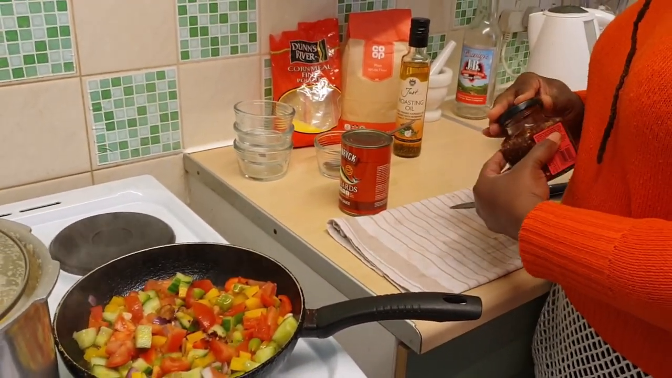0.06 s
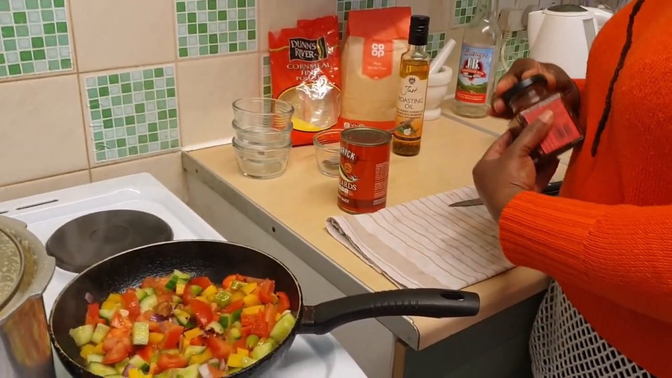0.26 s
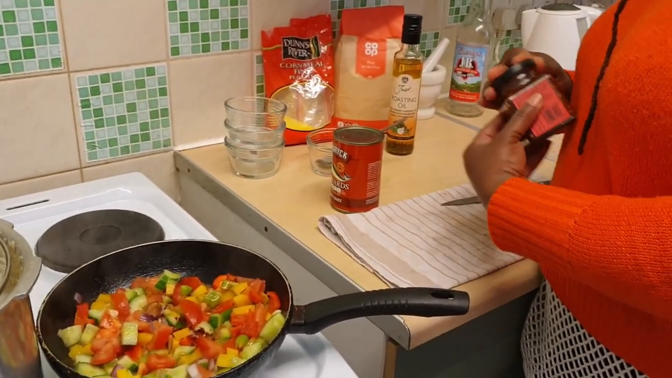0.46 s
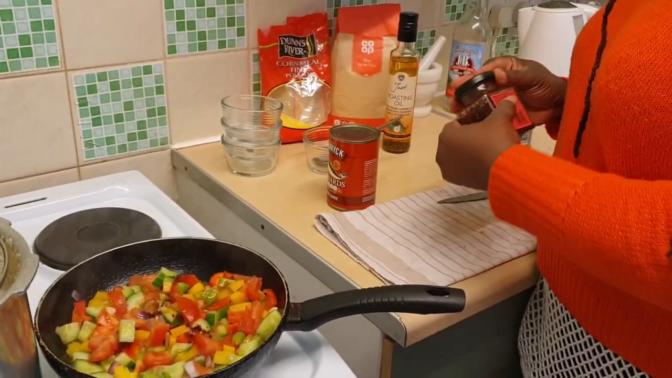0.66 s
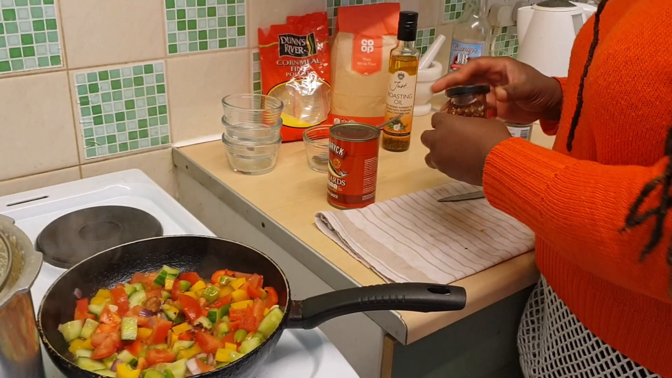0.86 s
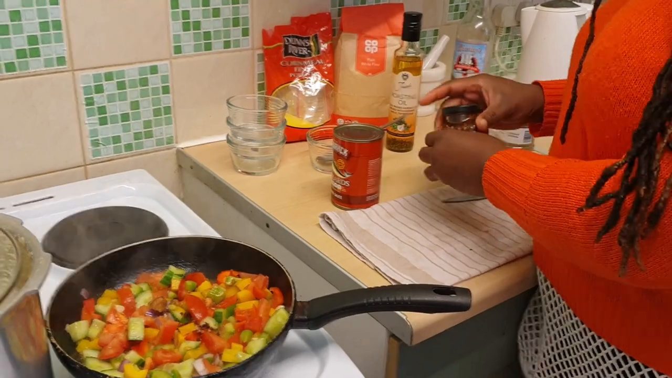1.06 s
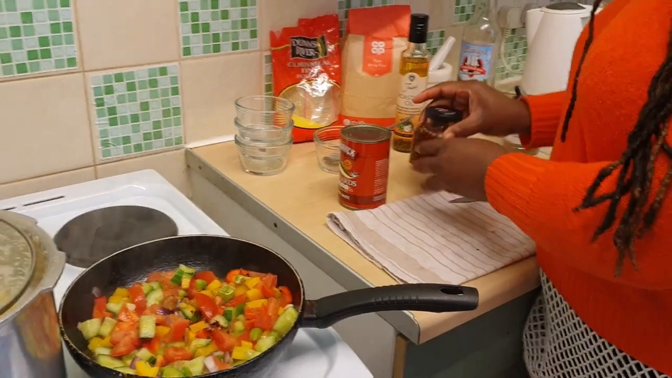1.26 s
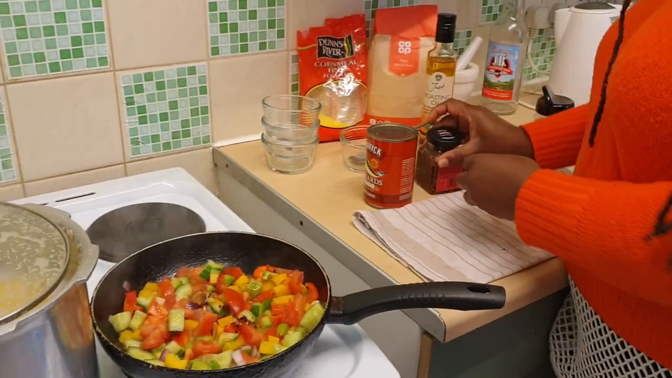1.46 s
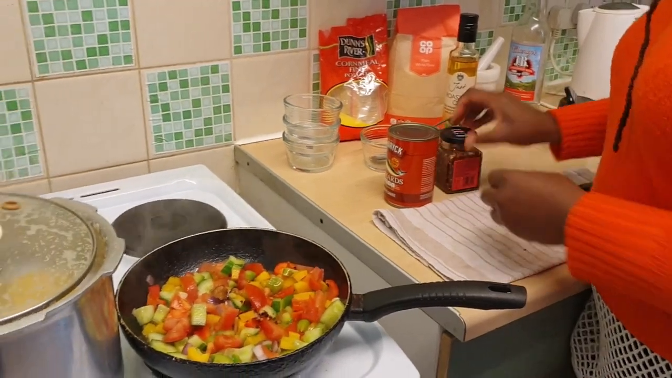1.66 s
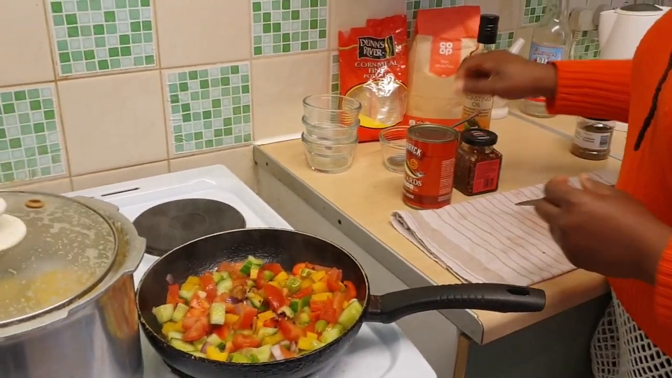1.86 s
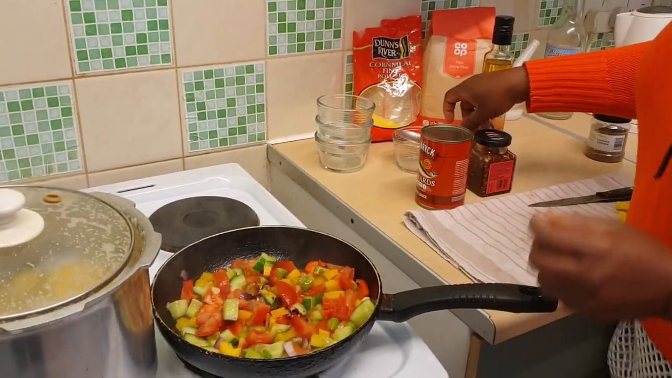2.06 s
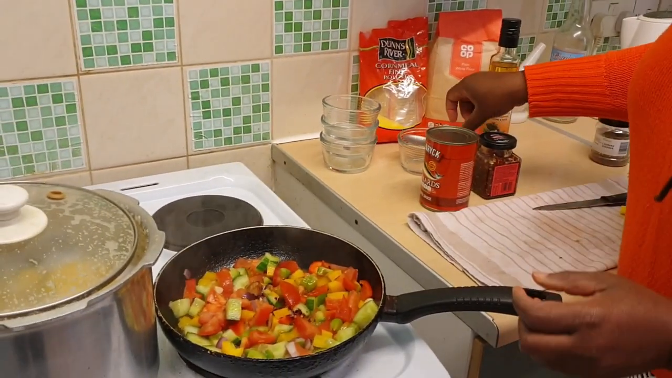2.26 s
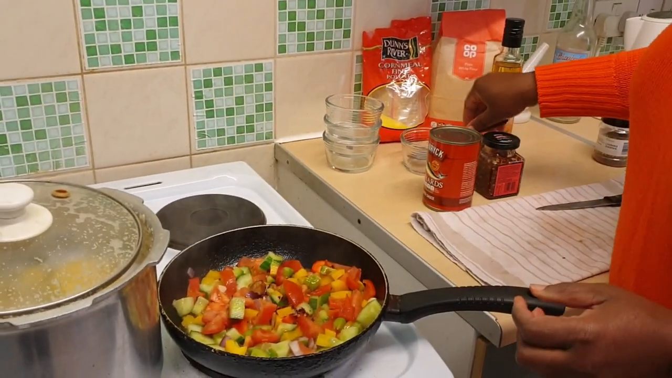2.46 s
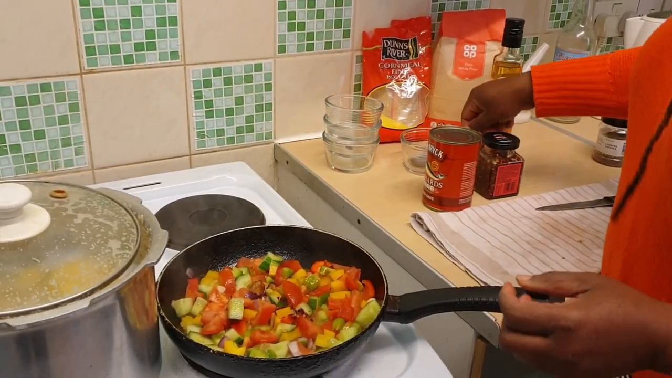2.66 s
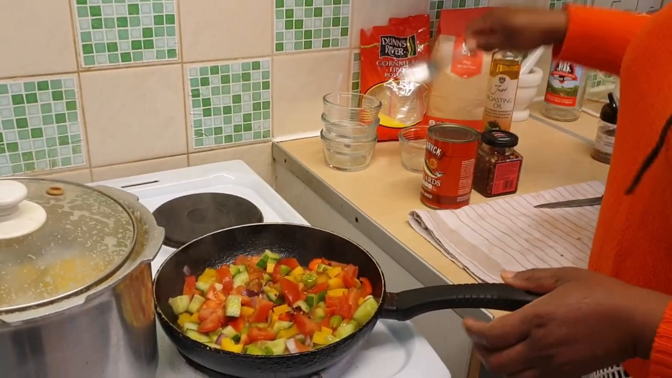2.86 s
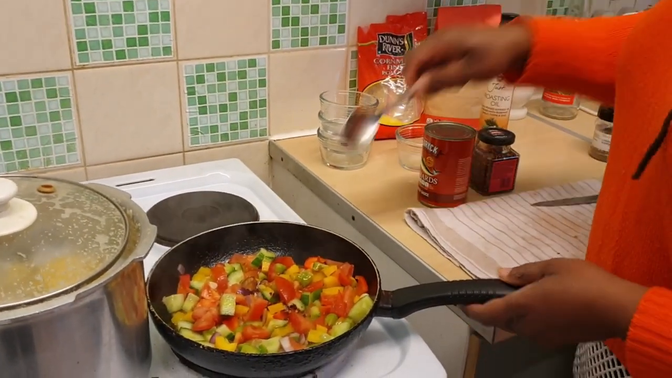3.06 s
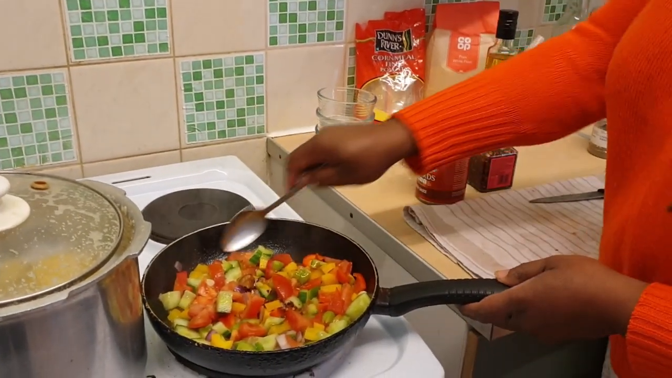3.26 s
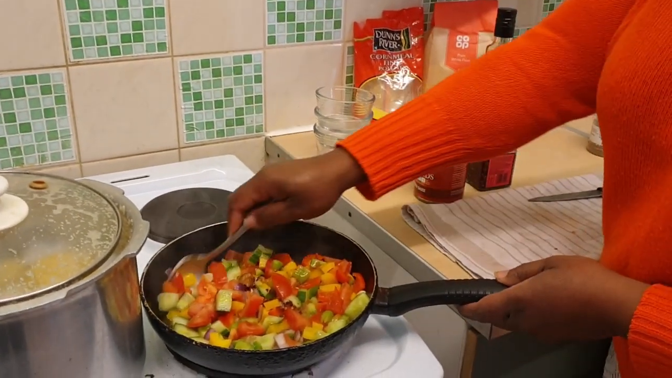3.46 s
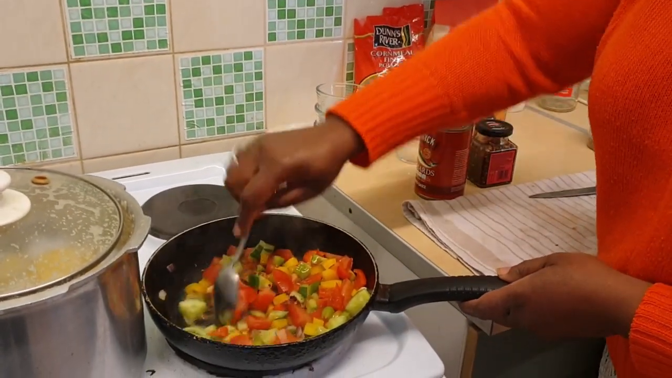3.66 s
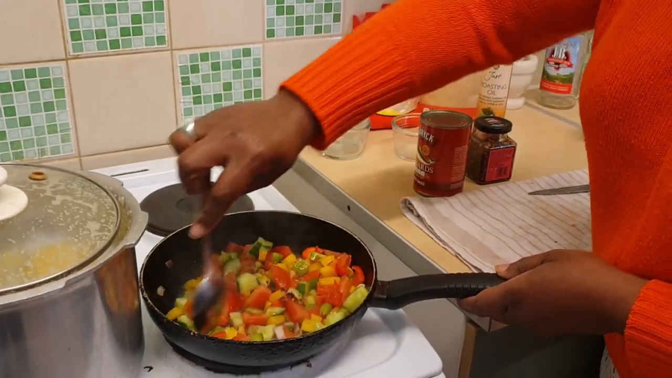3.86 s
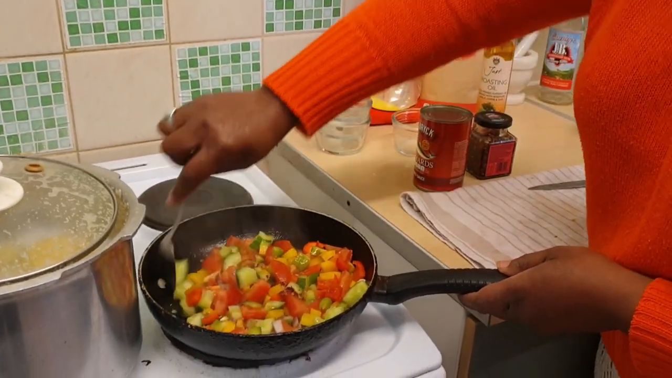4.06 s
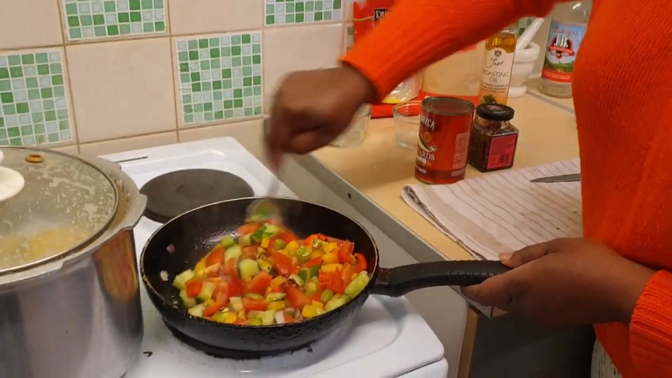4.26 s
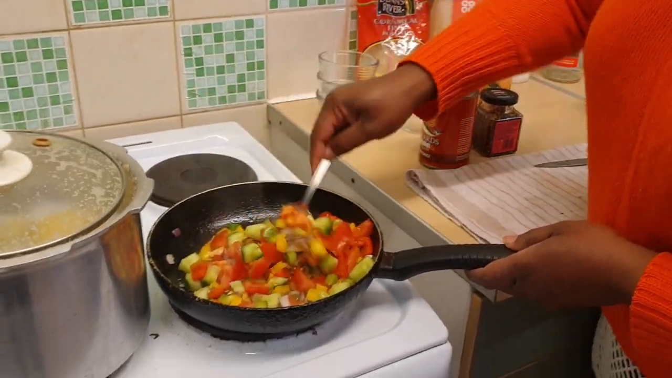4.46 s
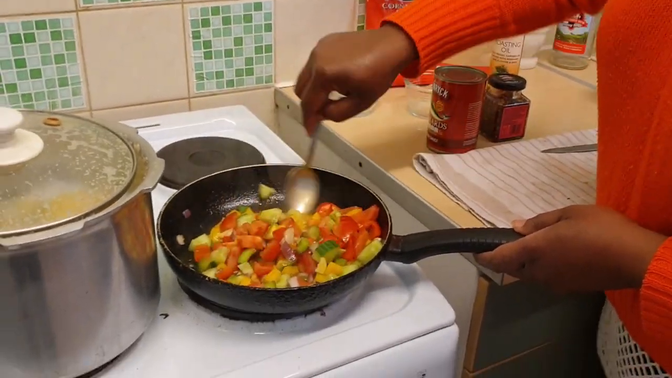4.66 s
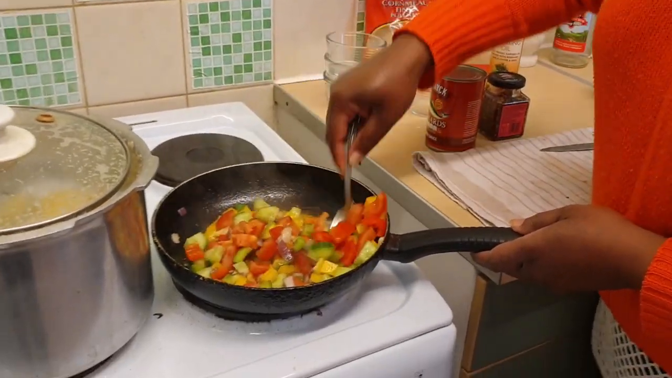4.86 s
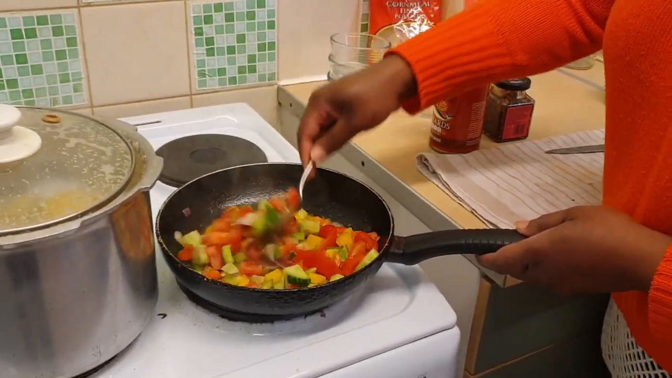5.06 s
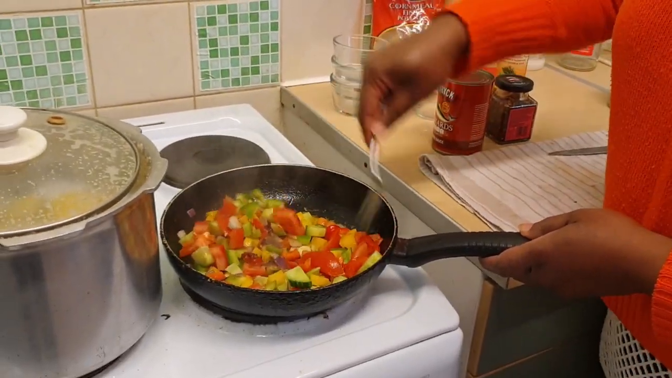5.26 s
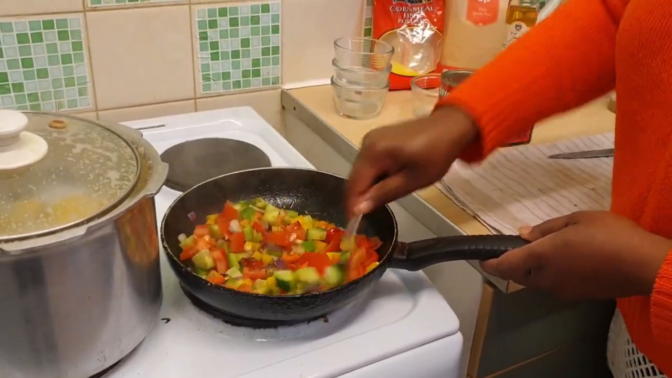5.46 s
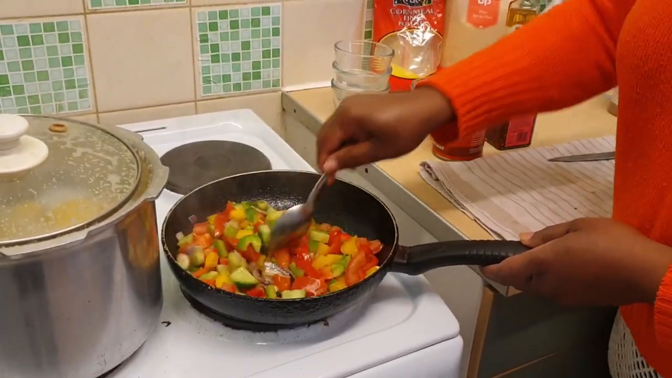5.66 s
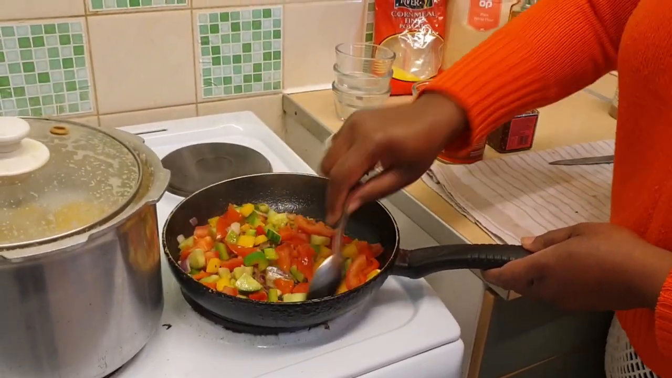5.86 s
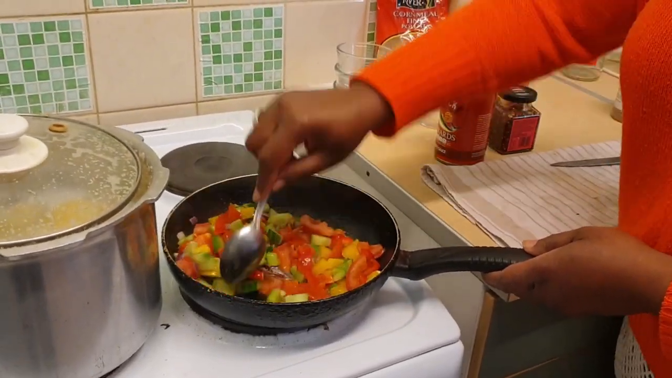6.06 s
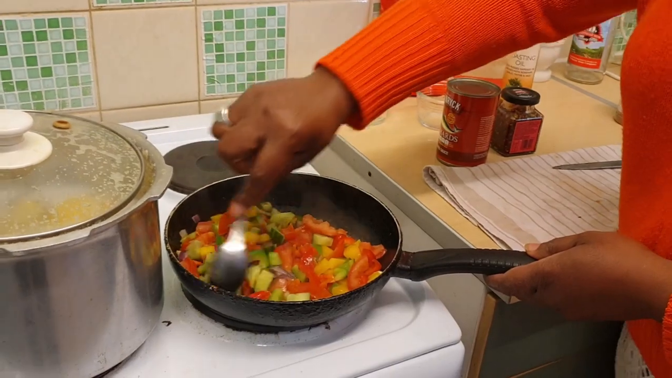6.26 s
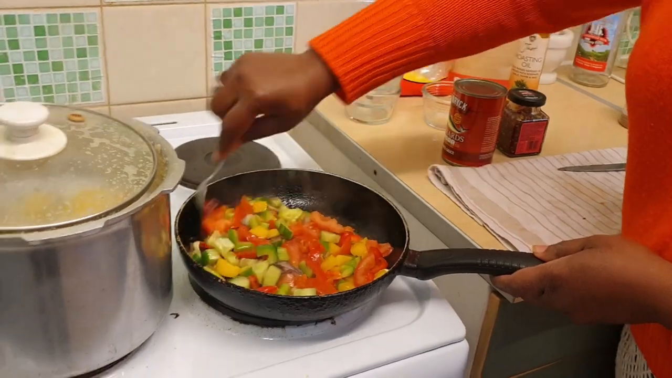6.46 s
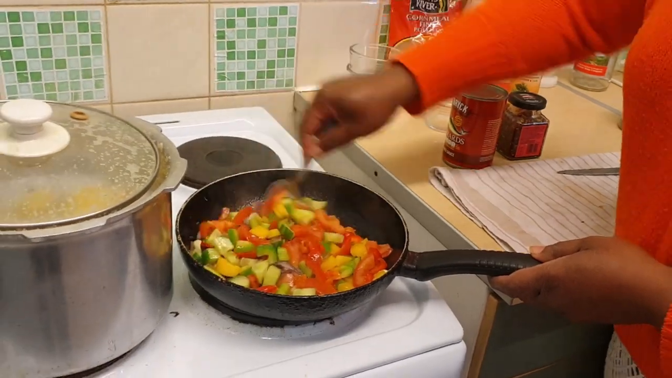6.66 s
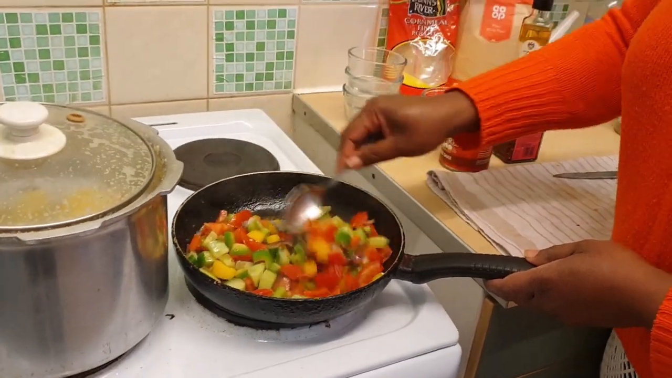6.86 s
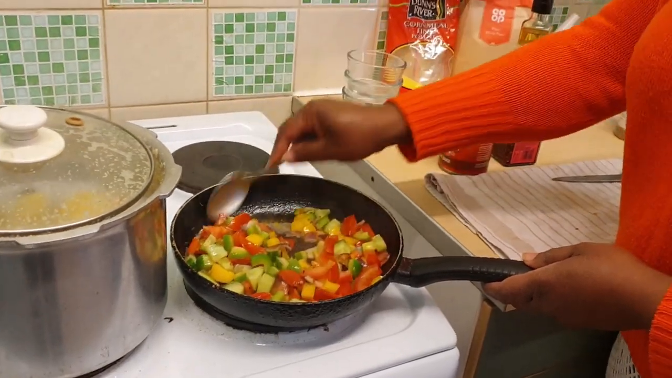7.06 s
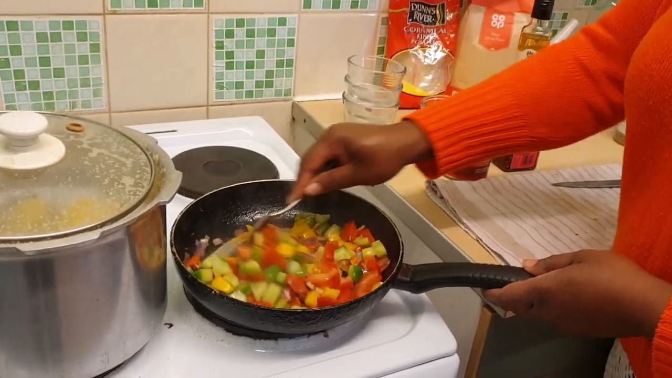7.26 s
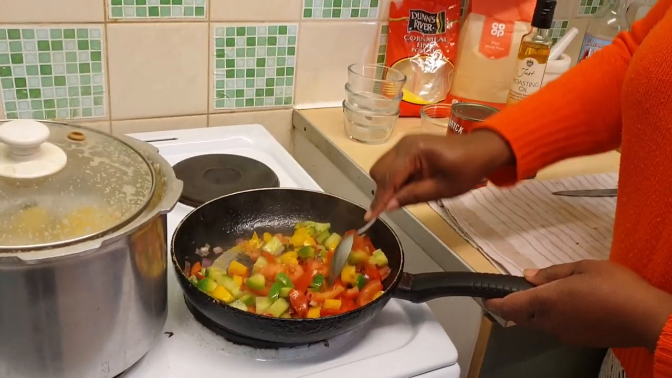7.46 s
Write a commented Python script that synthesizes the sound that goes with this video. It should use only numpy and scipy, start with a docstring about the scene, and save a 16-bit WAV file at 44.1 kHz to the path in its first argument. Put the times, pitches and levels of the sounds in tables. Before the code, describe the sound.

Vegetables fry with a continuous fine, crisp sizzle over a softer simmer and faint low cooker rumble. A small lid pops, a jar lands and rocks on a hollow worktop, and a spoon jingles brightly in a glass. The spoon then taps the pan rim, pushes food with dull rubs, scrapes and knocks, and the wet pieces spit harder. Close stereo microphones in a small tiled kitchen.

```python
"""A small tiled kitchen, where a spaced pair of microphones hears chopped vegetables sizzle in a frying pan.
Dense random crackle makes the fizz and simmer, with flares of spitting; the electric cooker rumbles as low noise.
A spice jar's lid pops shut and the jar lands on the worktop, shaking a spoon that stands in a glass.
The spoon jingles out, taps the pan, scrapes and knocks: blows are noise cracks with ringing modes,
and pushes and scrapes are crackle shaped by each stroke."""
import sys
import numpy as np
from scipy import signal
from scipy.fft import rfft, irfft, next_fast_len
from scipy.io import wavfile

SR = 44100
rng = np.random.default_rng(int(sys.argv[2]) if len(sys.argv) > 2 else 0)


def transcribe(signal):
    """Save signal, clipped to [-1, 1], as a 16-bit WAV file at the path in sys.argv[1]."""
    frames = np.atleast_2d(signal).T
    limited = np.clip(frames, -1, 1)
    pcm = np.round(limited * 32767).astype(np.int16)
    wavfile.write(sys.argv[1], SR, pcm)


N = 331191
TIME = np.arange(N) / SR

# likeness of the room's sound at the two microphones: f/Hz, correlation (-1 to 1)
LIKENESS = [(60, .88), (300, .9), (650, .7), (1000, .42), (1500, .05), (2300, -.12), (4000, 0), (16000, 0)]
# spectrum shared by the spitting pieces and the scraping spoon: f/Hz, level/dB
SPIT_AND_SCRAPE = [(200, -17), (700, -24.5), (1050, 1.5), (1400, -4.5), (1900, 3), (2600, -3), (3600, 2),
                   (4500, 0), (7000, -2.5), (16000, -39)]


def amp(db):
    """Decibels to gain."""
    return 10 ** (np.asarray(db) / 20)


def evened(x):
    """Scales to unit rms."""
    return x / np.sqrt(np.mean(x ** 2) + 1e-20)


def read(points, hz):
    """Reads a spectrum on a log-frequency axis."""
    f, value = np.transpose(points)
    return np.interp(np.log(hz + 1), np.log(f + 1), value)


def level(rows):
    """Gain curve through (t/s, level/dB) points."""
    return amp(np.interp(TIME, *np.transpose(rows)))


def add(mix, s, sound):
    """Mixes a sound in at time s."""
    part = mix[:, round(s * SR):][:, :sound.shape[1]]
    part += sound[:, :part.shape[1]]


def lean(db):
    """Left and right gains for a level difference; positive leans left."""
    return amp([[db / 2], [-db / 2]])


def colour(x, points, size=4096):
    """Causal (minimum-phase) filter with the given spectrum."""
    hz = abs(np.fft.fftfreq(size, 1 / SR))
    log_gain = np.log(amp(read(points, hz)))
    response = np.exp(signal.hilbert(log_gain).conj())  # the log gain's Hilbert transform gives the phase
    taps = np.fft.ifft(response).real[:size // 2]
    return signal.oaconvolve(x, taps[None], axes=1)[:, :x.shape[1]]


def cut(x, hz, kind):
    """Second-order low or high cut-off ("low" keeps what lies below hz)."""
    return signal.sosfilt(signal.butter(2, hz, kind, fs=SR, output="sos"), x)


def resonate(x, hz, width_hz):
    """A single resonance at hz, its width set by the damping."""
    pole = np.exp((2j * np.pi * hz - np.pi * width_hz) / SR)
    return signal.lfilter([1 - abs(pole)], [1, -pole], x).real


def pair(x):
    """Two spaced microphones hear much the same bass but nearly unrelated treble."""
    size = next_fast_len(x.shape[1])
    left, right = rfft(x, size)
    same = read(LIKENESS, np.fft.rfftfreq(size, 1 / SR))
    mid = (left + right) * np.sqrt(1 + same)
    side = (left - right) * np.sqrt(1 - same)
    return evened(irfft(np.array([mid + side, mid - side]), size)[:, :x.shape[1]])


def crackle(per_s, spread_db, direct_db, tail_s, count=6):
    """Tiny bursts of uneven size at several spots in the pan, each with its own reflections."""
    sizes = amp(spread_db * np.minimum(rng.exponential(1, N), 4)) * rng.choice([-1, 1], N)
    sizes *= rng.random(N) < per_s / SR
    spot = rng.integers(0, count, N)
    t = np.arange(SR // 8) / SR
    lag = round(.00014 * SR)
    out = np.zeros((2, N))
    for k in range(count):
        paths = rng.standard_normal((2, len(t))) * amp(-60 * t / tail_s)
        paths /= np.linalg.norm(paths[0])
        paths[[0, 1], [0, lag]] += amp(direct_db)  # direct sound, earlier in the left path
        bursts = (sizes * (spot == k))[None]
        out += signal.oaconvolve(bursts, paths, axes=1)[:, :N]
    return pair(out)


def blow(modes, clack, ring_db, crack_db, crack_s, room_s, swell_cycles, vary_db, blur, blur_hz=120):
    """A short crack, its wash off the tiles and the ringing modes; as much energy as 30 ms at unit rms."""
    t = np.arange(SR // 3) / SR
    fade = amp(crack_db) * np.exp(-t / crack_s) + amp(-60 * t / room_s)
    wash = colour(pair(rng.standard_normal((2, len(t)))) * fade, clack)
    ring = np.zeros_like(wash)
    for hz, db, t60 in modes:
        # phase between the microphones, from their likeness at this pitch
        apart = np.arccos(read(LIKENESS, hz)) * rng.choice([-1, 1])
        phase = rng.uniform(0, 2 * np.pi) + np.array([[0], [apart]])
        knots = rng.standard_normal(256) + 1j * rng.standard_normal(256)
        waver = 1 + blur * np.interp(t * blur_hz, np.arange(len(knots)), knots)  # reflections blur the line
        swell = 1 - np.exp(-t * hz / swell_cycles)  # a mode needs some cycles to fill the room
        decay = amp(db + vary_db * rng.standard_normal() - 60 * t / t60)
        mode = decay * swell * waver * np.exp(2j * np.pi * hz * t)
        ring += (np.exp(1j * phase) * mode).real
    return evened(evened(wash) + amp(ring_db) * evened(ring)) * np.sqrt(.03 / t[-1])


def flutter(knot_hz):
    """Slow random wandering of unit rms: the boiling is never quite even."""
    knots = rng.standard_normal(N // 100)
    return evened(np.interp(TIME * knot_hz, np.arange(len(knots)), knots))


def frying():
    """Water bursts in the hot oil as a fine fizz; juice simmers lower beneath it."""
    # course of the sizzle before its flutter: t/s, level/dB
    sizzle_course = [(0, -35.2), (1.0, -33.5), (1.5, -33), (1.7, -38), (2.2, -38.5), (3.5, -37.5),
                     (4.3, -35.5), (4.85, -34), (5.6, -36.5), (6.5, -36), (7.15, -37.5), (7.36, -34),
                     (7.5, -37.5)]
    # spectra of the fizz and of the simmer: f/Hz, level/dB
    fizz_spectrum = [(60, -28), (270, -23), (390, -12), (520, -7), (680, -6), (820, 2), (1000, -3),
                     (1500, -3.5), (2800, -3.5), (4500, -2), (8100, 0), (11000, -3), (13500, -6.5),
                     (16000, -10)]
    simmer_spectrum = [(60, -22), (280, -16), (390, -6), (460, -11), (550, -6), (640, -10), (820, 1),
                       (1200, -2), (1500, -4), (2050, 1), (2800, 1), (4500, -5), (8000, -16), (16000, -33)]
    flutter_db, flutter_hz = .5, 11  # rms swing, and how often it turns
    simmer_db, simmer_follows = -18.5, 0.61  # the simmer follows the sizzle, but swings less
    sizzle = level(sizzle_course) * amp(flutter_db * flutter(flutter_hz))
    fizz = colour(crackle(per_s=5000, spread_db=4.0, direct_db=-21.0, tail_s=0.13), fizz_spectrum)
    simmer = colour(crackle(per_s=3000, spread_db=3.0, direct_db=-17.0, tail_s=0.28), simmer_spectrum)
    fizz = lean(1.6) * sizzle * evened(fizz)
    simmer = lean(0.19) * amp(simmer_db) * sizzle ** simmer_follows * evened(simmer)
    return fizz + simmer


def rumble():
    """The cooker's body rumbles: low filtered noise that rises and falls."""
    # course of the rumble: t/s, level/dB
    rumble_course = [(0, -66), (2.75, -59.5), (3.8, -62.5), (5.1, -52), (6.1, -50), (6.95, -56.5),
                     (7.35, -51.5)]
    # spectrum of the cooker's body: f/Hz, level/dB
    cooker_spectrum = [(15, -35), (33, -28), (55, 3), (72, -6), (95, -16), (123, -1), (165, -11.5),
                       (290, -18.5), (1000, -53)]
    noise = colour(pair(rng.standard_normal((2, N))), cooker_spectrum)
    return lean(2.4) * level(rumble_course) * evened(noise)


def jar():
    """The lid pops, then the jar's base knocks and rocks on the hollow worktop."""
    # lid pops: t/s, level/dB
    lid_pops = [(0.306, -40), (0.3193, -24), (0.33, -28)]
    # the jar lands and rocks: t/s, level before dulling/dB, dulled above f/Hz
    jar_knocks = [(1.5359, -12, 4200), (1.543, -14.5, 1260), (1.698, -26, 2000), (1.708, -18.5, 1040),
                  (1.756, -22, 895), (1.81, -32.5, 700)]
    # ringing modes of lid and worktop: f/Hz, level/dB, 60 dB decay t/s
    lid_modes = [(729, -4.5, 0.12), (812, -21, 0.19), (935, -4, 0.045), (1680, -19, 0.1)]
    worktop_modes = [(130, -9.5, 0.29), (238, -15, 0.18), (337, -10, 0.14), (374.6, -5.5, 0.11),
                     (457.4, 1.5, 0.13), (502, -9, 0.19), (600, -18, 0.18), (712, -6.5, 0.15),
                     (801, -6, 0.14), (980, -8.5, 0.053), (1170, -11.5, 0.15), (1517, -3, 0.041),
                     (2090, -2.5, 0.037)]
    # toneless part of pop and knock: f/Hz, level/dB
    lid_clack = [(300, -39), (600, -11), (850, 2), (1300, -11), (2500, -13), (6000, -45)]
    jar_clack = [(40, -14), (90, -16), (130, -7), (220, -3), (450, 4.5), (800, 0.5), (1400, -2.5),
                 (2200, -9), (2900, -19), (8000, -34)]
    out = np.zeros((2, N))
    for s, db in lid_pops:
        pop = blow(lid_modes, lid_clack, ring_db=6.5, crack_db=5, crack_s=0.0046, room_s=0.33,
                   swell_cycles=3.2, vary_db=3.5, blur=.15)
        add(out, s, amp(db) * pop)
    for s, db, dull_hz in jar_knocks:
        knock = blow(worktop_modes, jar_clack, ring_db=2.5, crack_db=-3.0, crack_s=0.0038, room_s=0.3,
                     swell_cycles=2.5, vary_db=0.2, blur=0.29)
        add(out, s, amp(db) * cut(knock, dull_hz, "low"))
    return lean(2.1) * out


def glass(count=3):
    """The spoon bounces against the glass; each touch rings a different blend of modes."""
    # spoon hits: t/s, level/dB, favoured f/Hz, first bounce after t/s, change per bounce level/dB, buzz (0-1)
    rattles = [(1.541, -28.5, 13500, .013, 1, 0.7), (1.706, -36.5, 12200, .018, 4, 1),
               (1.755, -28, 3900, .034, -3.5, 1), (2.2396, -22.5, 2230, .017, -0.5, 0.06),
               (2.274, -23, 2230, .015, -3.5, 0.1), (2.329, -23.5, 2300, .022, -3, 0.65),
               (2.395, -31.5, 1500, .03, -3.5, 1), (2.728, -20.5, 2180, 0.011, -9.5, 0),
               (2.731, -22.5, 5300, 0.016, -12, .1)]
    # ringing modes of the glass: f/Hz, level/dB, 60 dB decay without buzz t/s
    glass_modes = [(2223, -4.3, .29), (3004, -16, .25), (3900, -11, .18), (5300, -3, .27), (6002, -9, .25),
                   (7251, -10, .27), (8479, -13, .22), (9180, -10, .2), (9378, -2, .22), (9835, -12, .2),
                   (11337, -8, .22), (13130, -11, .2), (13840, -14, .2), (14390, -11, .18),
                   (15448, -9, .22)]
    # toneless part of a clink: f/Hz, level/dB
    glass_clack = [(60, -10), (250, 2.5), (470, 4), (820, 11), (1500, -1), (2250, 5), (3200, -1.5),
                   (4600, -3.5), (5500, -2), (8000, -4.5), (9500, -3.5), (12300, 1), (14000, -2.5),
                   (16000, -0.5)]
    bounce_shrink = .75  # each bounce comes sooner than the last
    out = np.zeros((2, N))
    for s, db, spot_hz, gap_s, bounce_db, buzz in rattles:
        modes = []
        for hz, mode_db, t60 in glass_modes:
            # the spot that is touched favours the modes near one pitch
            octaves = np.log2(hz / spot_hz)
            favour_db = 9 * np.exp(-(octaves / 0.2) ** 2)
            modes.append((hz, mode_db + favour_db, t60 * (1 - 0.1 * buzz)))  # a buzzing contact damps
        for k in range(count):
            # a buzzing contact also roughens the ring
            clink = blow(modes, glass_clack, ring_db=5.5, crack_db=-3, crack_s=.002, room_s=.23,
                         swell_cycles=3, vary_db=1.5, blur=buzz, blur_hz=300)
            add(out, s, amp(db + bounce_db * k) * clink)
            s += gap_s * bounce_shrink ** k
    return lean(0.2) * out


def dragging():
    """Each push through the food starts firmly and eases off, rubbing the pan's floor in dull jerks."""
    # the pan is nudged, or the spoon pushes food over its floor: start t/s, stroke t/s, level/dB
    drags = [(1.973, 0.1, -48), (3.08, 0.098, -50), (3.345, 0.34, -47.5), (3.981, 0.17, -40.5),
             (4.252, 0.28, -51), (4.76, 0.34, -45.5), (5.45, 0.56, -50.5), (6.265, 0.58, -42.5)]
    # spectrum of the rubbing: f/Hz, level/dB
    drag_spectrum = [(60, -13), (120, 1), (160, -4.5), (225, 1.5), (290, -3), (400, -1), (650, -12.5),
                     (1200, -1), (4000, -40)]
    peak, fade_db = 0.097, -12.5  # peaks at this share of the stroke; fade grows with the square of strokes since
    push = np.zeros(N)
    for s, length, db in drags:
        strokes = np.clip((TIME - s) / length, 0, 10)
        easing = amp(db + fade_db * np.maximum(strokes - peak, 0) ** 2)
        push += easing * np.minimum(strokes / peak, 1)
    rub = colour(crackle(per_s=300, spread_db=1.0, direct_db=-11.5, tail_s=0.1), drag_spectrum)
    return lean(3.0) * push * evened(rub)


def pan():
    """The spoon's edge rings the rim; cushioned by food it thuds on the floor."""
    # spoon blows: t/s, rim tap level/dB, floor thud level before thinning/dB, thud thinned below f/Hz
    pan_blows = [(3.3205, -20, -36.5, 200), (4.244, -60, -43, 200), (4.717, -34.5, -35, 140),
                 (4.741, -31, -37.5, 100), (5.392, -21.5, -32.5, 100), (5.399, -21, -33, 100),
                 (5.468, -33, -38.5, 130), (5.934, -49, -32.5, 260), (6.283, -53, -37.5, 230),
                 (7.2145, -42, -29.5, 457), (7.236, -47, -31, 420)]
    # ringing modes of rim and floor: f/Hz, level/dB, 60 dB decay t/s
    rim_modes = [(2030, -1, .16), (2750, -3, .2), (3620, -8, .13), (4585, -3, .15), (5500, 2, .18),
                 (6340, -8, .18), (6735, -8, .17), (7580, -4, .17), (8230, -7, .13), (8690, -9, .15),
                 (10090, -11, .17)]
    floor_modes = [(197.3, -1, 0.33), (240, -7, 0.041), (321, 10, 0.064), (386.5, -0.5, 0.18),
                   (542, -6, 0.27), (864, 4, 0.13), (997, -18, 0.25)]
    # toneless part of tap and thud: f/Hz, level/dB
    tap_clack = [(100, -6), (450, -23.5), (750, -2.5), (1400, 2.5), (2300, 6), (3500, -1), (5000, -3),
                 (8500, -1), (12000, -10), (16000, -17)]
    thud_clack = [(40, -32), (120, -3), (250, 4), (450, -5.5), (680, -10), (1050, -3.5), (1600, -10),
                  (4000, -14), (12000, -22)]
    out = np.zeros((2, N))
    for s, tap_db, thud_db, thin_hz in pan_blows:
        tap = blow(rim_modes, tap_clack, ring_db=-4.5, crack_db=5, crack_s=.002, room_s=.2,
                   swell_cycles=3, vary_db=1.8, blur=.75, blur_hz=250)
        thud = blow(floor_modes, thud_clack, ring_db=-3, crack_db=-4, crack_s=0.014, room_s=0.23,
                    swell_cycles=1.7, vary_db=3.5, blur=1.0)
        add(out, s, amp(tap_db) * tap + amp(thud_db) * cut(thud, thin_hz, "high"))
    return lean(0.87) * out


def scraping():
    """The spoon slips along the wall, pressing harder until it lifts; its tilt sets the pitch of each stroke."""
    # scrapes: start t/s, length t/s, level/dB, pitch f/Hz
    scrapes = [(3.956, 0.2, -38, 1010), (4.15, 0.12, -42, 1030), (4.27, 0.12, -32, 2100),
               (4.33, 0.035, -42, 4300), (4.793, 0.093, -28.5, 1680), (4.858, .11, -31, 1070),
               (6.38, 0.23, -45, 1060), (6.678, 0.084, -38.5, 2620), (6.761, 0.045, -31.5, 1320)]
    build, release_s = 1.24, 0.03  # power by which pressure builds; dying away after the lift
    width_hz, raw = 480, 0.55  # width of the resonance; gain of the slips that pass beside it
    slips = crackle(per_s=1100, spread_db=2.0, direct_db=-6.5, tail_s=0.43)
    slips = evened(colour(slips, SPIT_AND_SCRAPE))
    out = np.zeros((2, N))
    for s, length, db, hz in scrapes:
        pressure = np.clip((TIME - s) / length, 0, 1) ** build
        release = np.exp(-np.clip((TIME - s - length) / release_s, 0, 20))
        rasp = evened(resonate(slips, hz, width_hz))
        out += amp(db) * pressure * release * evened(rasp + raw * slips)
    return lean(1.5) * out


def flares():
    """Wet pieces turned onto hot metal spit at once and calm down as their faces dry."""
    # flares: t/s, level before rise and fade/dB
    flare_starts = [(5.1, -36), (5.42, -40), (6.68, -44), (7.28, -52)]
    rise_s, fade_s, flare_hz = 0.047, 1, 2470
    strength = np.zeros(N)
    for s, db in flare_starts:
        age = np.maximum(TIME - s, 0)
        strength += amp(db) * (1 - np.exp(-age / rise_s)) * np.exp(-age / fade_s)
    spit = crackle(per_s=1500, spread_db=2.5, direct_db=-7, tail_s=0.75)
    spit = evened(colour(spit, SPIT_AND_SCRAPE))
    peaked = evened(resonate(spit, flare_hz, width_hz=800))
    return lean(0.63) * strength * evened(peaked + .9 * spit)


def scene():
    """Everything at the cooker and the worktop."""
    return frying() + rumble() + jar() + glass() + dragging() + pan() + scraping() + flares()


def record(dry):
    """The recorder's band limit: a steep low-pass."""
    edge_hz = 15950
    taps = signal.firwin(511, edge_hz, window=("kaiser", 9), fs=SR)
    return signal.oaconvolve(dry, taps[None], "same")


dry = scene()
out = record(dry)
transcribe(out)
```